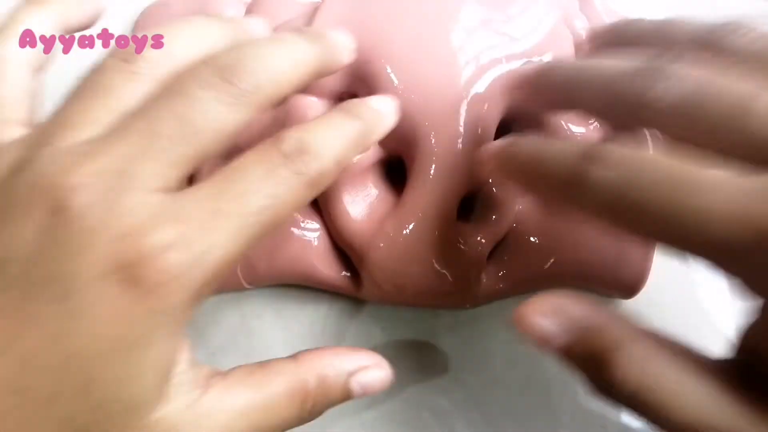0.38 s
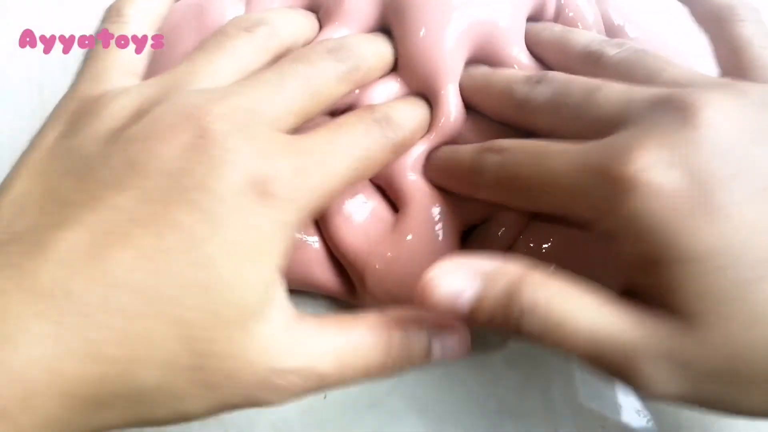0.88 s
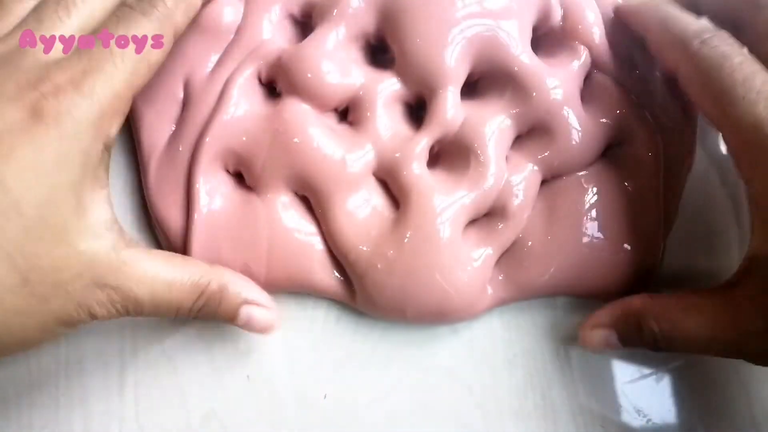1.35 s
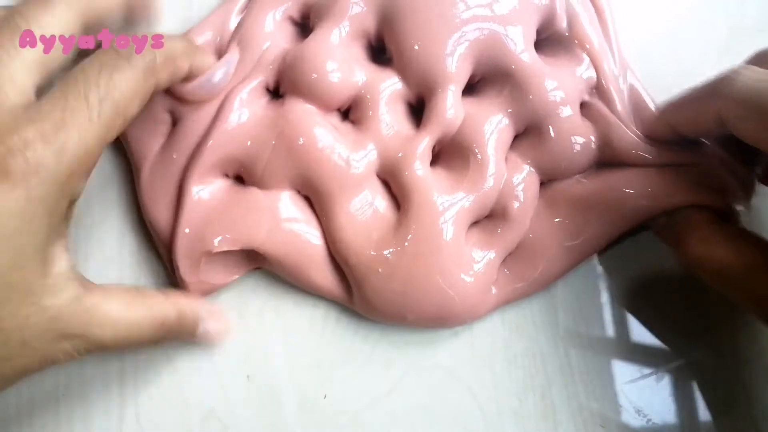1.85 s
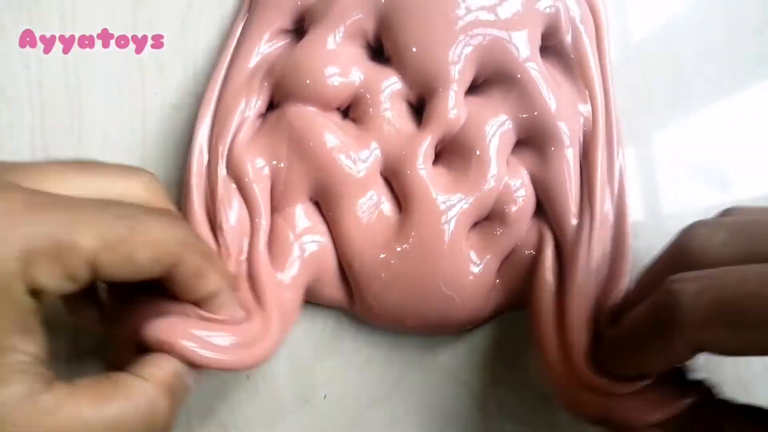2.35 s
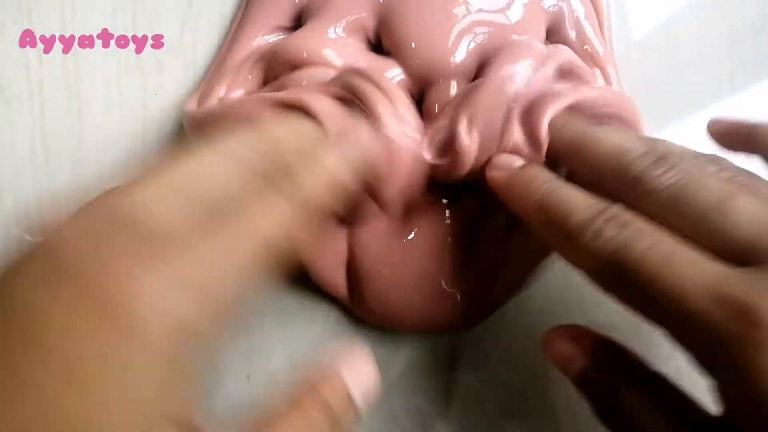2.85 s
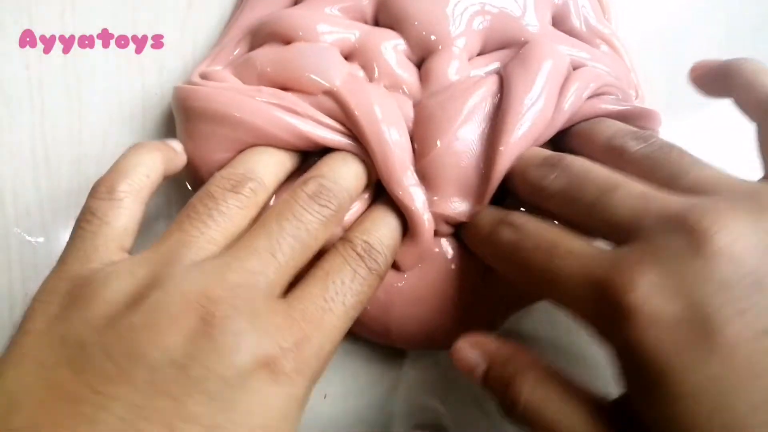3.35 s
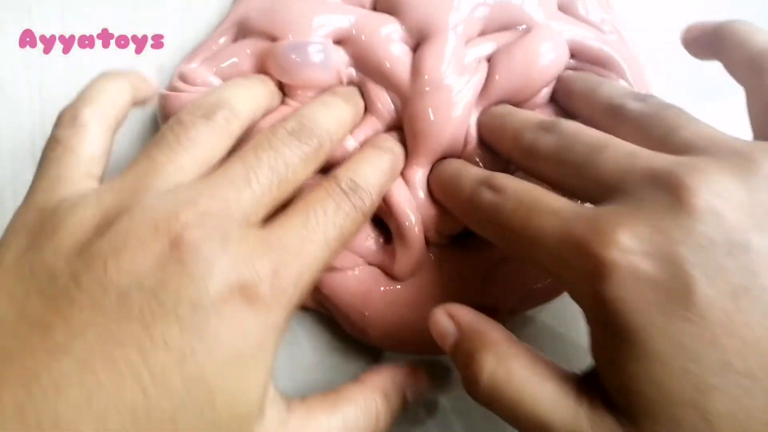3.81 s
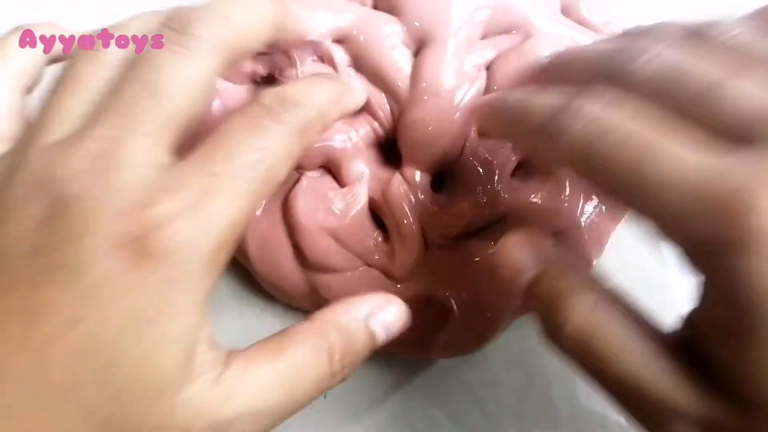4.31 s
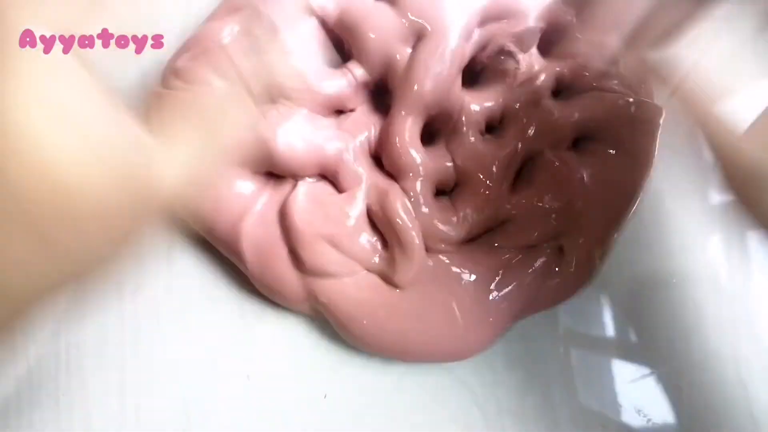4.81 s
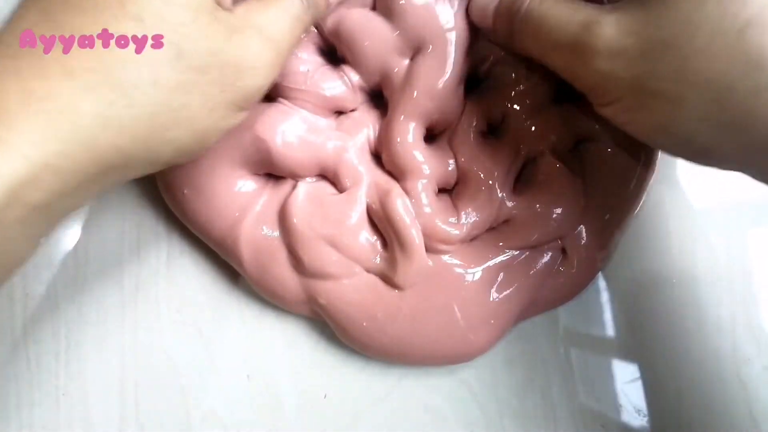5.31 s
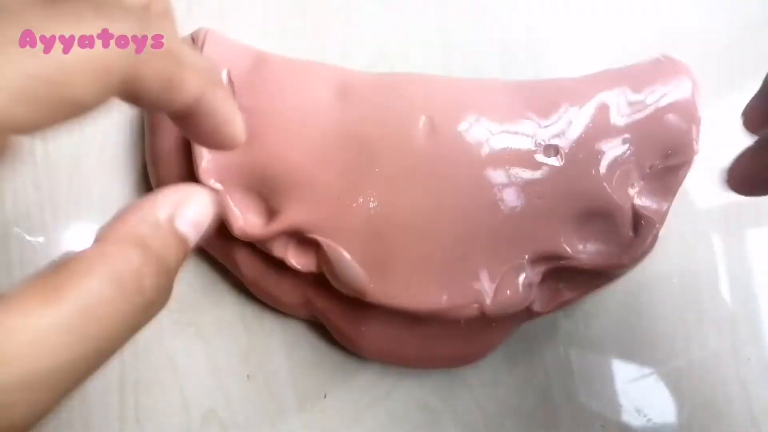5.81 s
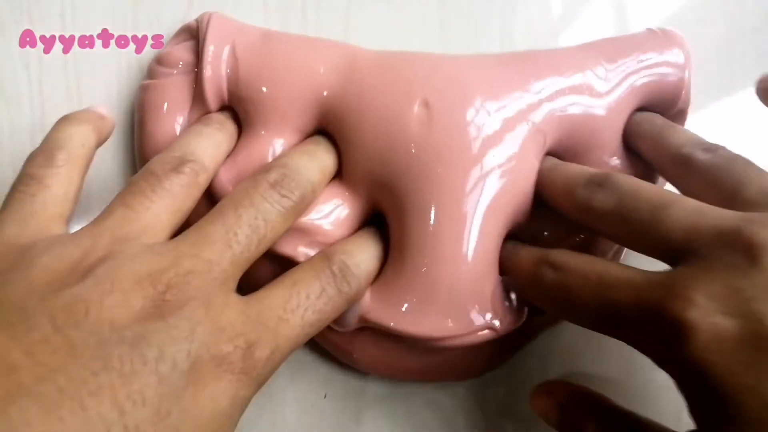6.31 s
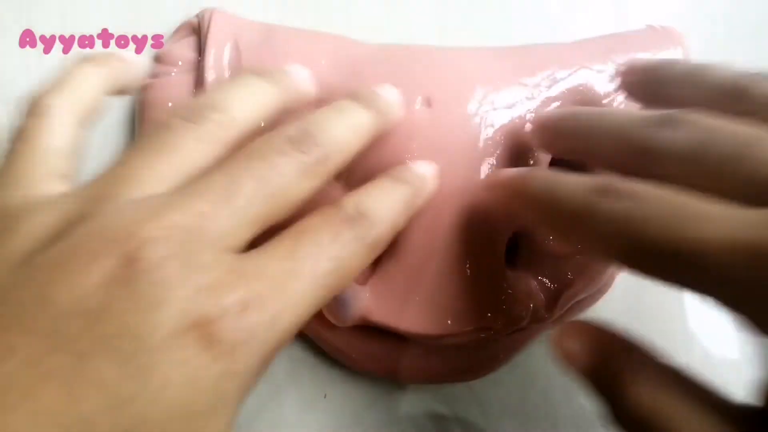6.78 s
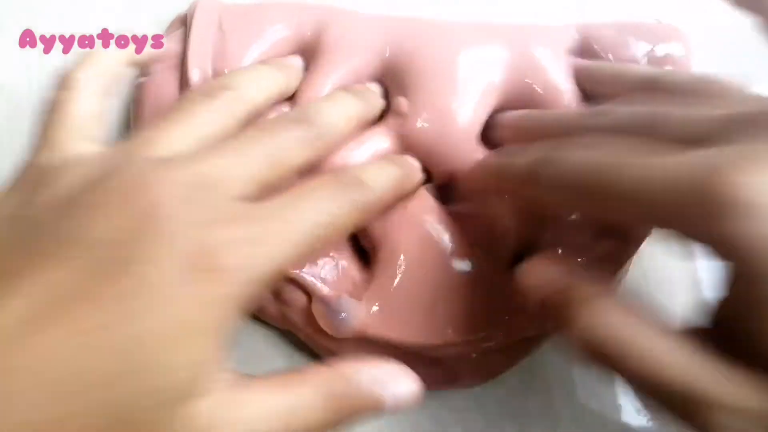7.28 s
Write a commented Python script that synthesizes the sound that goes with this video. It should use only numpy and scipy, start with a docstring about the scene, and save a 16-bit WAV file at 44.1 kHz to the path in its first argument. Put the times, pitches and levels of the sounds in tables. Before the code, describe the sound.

Thick glossy slime pops under fingers: several loud, dry-edged clicks with quick rising hollow tones crowd into each brief burst, spread left and right. The first two bursts lead to a long quiet stretch of faint stretching ticks and rustle, then louder bursts return. A small table resonance and short room tail follow each one. Far chirps and a soft low hum sit almost unheard behind, recorded very close.

```python
"""Fingers pull out of thick glossy slime on a table in a small room, close to a pair of microphones.
From the start, in bursts to the end, noisy clicks snap and gliding sines ring the holes; the table rings along.
A small object clinks among the first pops as decaying sines. Then filtered grains rustle between the bursts,
far noise-blurred chirps come in, faint ticks click as the slime is stretched, and soft knocks follow.
Throughout, a noise tail gives the room, and shaped noise gives the low rumble, wavering hum and hiss."""
import sys
import numpy as np
from scipy import signal
from scipy.fft import rfft, irfft, next_fast_len
from scipy.io import wavfile

SR = 44100
rng = np.random.default_rng(int(sys.argv[2]) if len(sys.argv) > 2 else 0)


def amplitude_ratio(level_db):
    """Convert a level in decibels to the matching linear amplitude (field) ratio."""
    exponent = np.asarray(level_db, float) / 20
    return 10 ** exponent


def output_pcm(signal):
    """Save a mono or channel-first signal as 16-bit PCM at the path in sys.argv[1].

    Samples are clipped to [-1, 1] before scaling.
    """
    pcm = np.clip(np.atleast_2d(signal).T, -1, 1) * 32767
    wavfile.write(sys.argv[1], SR, np.round(pcm).astype(np.int16))


N = 326767

# a finger pops out: t/s, snap rms level/dB, hole peak level/dB, hole f/Hz, left-right level/dB
POPS = [(0.0546, -44.5, -52.5, 1920, -11.5), (0.0703, -36, -43.5, 1206, -2), (0.197, -23.5, -25, 1400, -1),
        (0.2076, -33, -21.5, 960, 7.5), (0.2116, -12, -20, 1340, 1), (0.231, -12, -20, 1650, 0.5),
        (0.2383, -26, -24.5, 1200, 0), (0.2613, -30.5, -27.5, 1122, -2), (0.941, -29, -22, 1300, 4.5),
        (0.9444, -17.5, -21.5, 1300, -1.5), (0.952, -12.5, -19.5, 2220, 2.5),
        (0.9696, -16.5, -17.5, 1904, -3), (0.979, -37.5, -30, 2060, -0.5), (3.4207, -11.5, -20, 1914, 7.5),
        (3.4468, -6, -24, 1400, -6.5), (3.458, -20, -19, 1090, 3), (3.4653, -7.5, -15, 1394, 1),
        (3.9699, -57, -64, 2964, 8.5), (4.157, -29.5, -31, 1340, 2.5), (4.1734, -24, -17, 1420, 1.5),
        (4.1794, -12, -19.5, 1365, 0), (4.184, -23, -30, 1210, -8), (4.1929, -11.5, -19.5, 1280, -2.5),
        (4.2112, -21.5, -17, 1240, 1), (4.7745, -35.5, -33.5, 2160, 2), (4.7835, -35, -36, 750, 3),
        (4.7922, -29.5, -22, 2355, -1.5), (4.7974, -12, -18.5, 1660, -3.5), (4.8094, -23, -16, 1190, -2),
        (4.822, -17, -18.5, 1160, 0), (5.683, -35, -33.5, 790, 5), (5.7008, -60, -49, 700, -4.5),
        (5.7213, -49.5, -38.5, 1130, -2.5), (6.5749, -12.5, -20.5, 2260, 0.5), (6.5925, -5, -15.5, 1004, 1),
        (6.594, -12, -18, 886, 3), (6.5989, -13, -16.5, 1339, 6.5), (6.6094, -18, -27, 1170, 3),
        (6.62, -15.5, -15, 1820, 2), (7.2776, -27.5, -25.5, 945, 6), (7.2958, -24.5, -30.5, 1160, 0),
        (7.3006, -18, -17.5, 1340, 0), (7.3112, -22.5, -17.5, 990, 4), (7.3215, -25, -49, 1070, -1),
        (7.3259, -16.5, -20.5, 1280, -6), (7.334, -42.5, -31, 1330, -7), (7.341, -32, -31.5, 1200, 3)]
# modes of the table top under a pop: f/Hz, width/Hz, relative level/dB
TABLE_MODES = [(161, 74, -12.5), (348.5, 34, -10.5), (649, 24, -10), (807, 63, -6.5), (893, 28, -8.5),
               (1040, 54, -5), (1090, 46, -2), (1300, 110, -11.5), (1643, 40, -8.5), (1890, 43, -12),
               (2223, 53, -7), (2530, 150, -4.5)]
# stretched slime lets go of skin or table: t/s, snap rms level/dB, left-right level/dB
TICKS = [(1.4194, -63, 8), (1.5545, -59.5, -8), (1.7958, -61, 0), (1.9743, -61, -1.5), (2.2764, -68, 10),
         (2.539, -70, -2.5), (2.6994, -70.5, -3), (3.1659, -57.5, 4), (3.1751, -67, 14.5),
         (3.978, -67.5, 0), (5.147, -56.5, -3), (5.2434, -63.5, -1), (5.3369, -62.5, -3.5),
         (5.6194, -63, -4)]
# bright part of the sticky rustle while the slime is handled: t/s, rms level/dB
RUSTLE = [(0.5, -78.5), (0.749, -82.5), (0.9, -69), (1.25, -89), (1.45, -81), (2.2, -77), (2.289, -66.5),
          (2.66, -79.5), (3.14, -75.5), (3.401, -90.5), (4.72, -88.5), (5.05, -70), (5.5, -78), (5.64, -68),
          (5.85, -88.5), (6.2, -84.5), (6.3, -69), (6.52, -85)]
# a small hard object is touched once: t/s, level/dB
CLINK = (.0712, -44)
# its ringing modes: f/Hz, relative level/dB, t60/s
CLINK_MODES = [(2280, -7, 0.047), (4200, -10, 0.073), (7321, -17.5, .19), (8129, -19.5, .2),
               (8570, 4, 0.15), (8640, -9.5, .23), (11130, -18, .3)]
# small knocks on the table: t/s, level before the soft onset/dB, f/Hz, t60/s
BUMPS = [(1.9, -50.5, 192, 0.13), (5.041, -50.5, 331.7, 0.13), (5.774, -46, 2900, 0.024)]
# room tail by band: low f/Hz, high f/Hz, relative level/dB, t60/s, left-right likeness (1 = same)
ROOM_BANDS = [(102, 600, -33.5, 0.14, .9), (605, 1200, -36.5, 0.21, 0.28), (1400, 3200, -35.5, 0.22, 0.11),
              (2480, 4500, -37, .2, .01), (5500, 10500, -43, 0.27, .01), (10400, 12000, -39.5, 0.16, .01),
              (13100, 20000, -32.5, 0.15, .01)]
# far thin chirps: t/s, length/s, start f/Hz, end f/Hz, rms level before the fades/dB
CHIRPS = [(1.244, .16, 2907, 2799, -68), (4.358, 0.11, 2986, 2910, -69), (4.418, .08, 6505, 6800, -72.5),
          (5.956, .1, 7300, 6876, -71.5), (6.025, .1, 6320, 6340, -72), (6.991, .11, 7300, 7230, -71),
          (7.085, 0.11, 6650, 6540, -74)]
# spectrum of rumble and hiss: f/Hz, relative level per Hz/dB
FLOOR_SPECTRUM = [(12, -33.5), (20, -4), (111, -2), (189, -8), (237, -13), (361, -14), (551, -20.5),
                  (1210, -26), (5670, -30), (7100, -26), (9410, -31.5), (10500, -24.5), (12100, -34.5),
                  (15500, -29.5), (15750, -52.5)]
# how alike the two channels of that noise are: f/Hz, left-right likeness (1 = same)
FLOOR_LIKENESS = [(60, 0.93), (180, 0.92), (550, 0.2), (1650, -0.14), (4970, 0.037), (15000, -0.03)]
# faint wavering hum: f/Hz, width at half amplitude/Hz, rms level before the left-right tilt/dB
HUM = [(38, 14, -76), (110, 23, -71.5), (192.5, 5.6, -76)]


def at_hz(points, hz):
    """Read a curve on a log-frequency axis."""
    point_hz, value = np.transpose(points)
    return np.interp(np.log(hz), np.log(point_hz), value)


def rms_one(x):
    """Scale to rms 1."""
    return x / np.sqrt(np.mean(x ** 2) + 1e-20)


def band(x, low_hz, high_hz):
    """Butterworth band-pass."""
    edges = [low_hz, min(high_hz, 0.45 * SR)]
    return signal.sosfilt(signal.butter(2, edges, "band", fs=SR, output="sos"), x)


def ring(x, hz, t60):
    """A resonator: a unit click sets a decaying sine of starting height 1 ringing."""
    r, w = amplitude_ratio(-60 / (t60 * SR)), 2 * np.pi * hz / SR
    return signal.lfilter([0, np.sin(w)], [1, -2 * r * np.cos(w), r * r], x + 1e-18)


def two_channels(mid, side, alike):
    """Mix two unrelated noises into a left-right pair of the given likeness."""
    alike = np.clip(alike, -1, 1)
    return np.sqrt(1 + alike) * mid + np.sqrt(1 - alike) * side * [[1], [-1]]


def add(out, s, sound, pan_db):
    """Place a sound at time s, louder on the left by pan_db."""
    i = round(s * SR)
    panned = sound * amplitude_ratio(np.array([[pan_db], [-pan_db]]) / 2)
    out[:, i:i + sound.shape[-1]] += panned[:, :N - i]


def pops():
    """Each seal snaps and its finger hole rings like a short bottle."""
    seals = snaps([(s, snap_db, pan_db) for s, snap_db, _, _, pan_db in POPS])
    return band(holes() + seals, 500, 17000)  # the pops carry nothing below 500 Hz


def snaps(rows):
    """Every tear has a pitch of its own, set by its gap, and its own share of spitting air."""
    out = np.zeros((2, N))
    for s, snap_db, pan_db in rows:
        gap_hz = rng.normal(8140, 406)
        spit_db = snap_db + rng.normal(-12, 3)
        add(out, s, snap(gap_hz, snap_db, spit_db), pan_db)
    return out


def snap(gap_hz, snap_db, spit_db):
    """A film tears in dying clicks that ring briefly at the size of the gap, under a thin spit of air."""
    size, tear_s, clicks_per_s = 600, 0.0016, 4000
    t = np.arange(size) / SR
    # each microphone hears the tear by its own path
    struck = rng.random((2, size)) < clicks_per_s / SR
    clicks = struck * rng.normal(0, 1.8, (2, size)) * np.exp(-t / tear_s)
    clicks[:, 0] = rng.choice([-1, 1], 2)
    crackle = amplitude_ratio(-3.0) * band(clicks, 5500, 11000)
    body = band(ring(clicks, gap_hz, 0.0016) + crackle, 3000, 13000)
    air = band(clicks, 10500, 24000) + amplitude_ratio(-9.5) * ring(clicks, 15000, 0.0029)
    spit = band(air, 6300, 18000)

    def even(x):
        """Scale the energy to rms 1 over 2.6 ms (115 samples)."""
        return x / np.sqrt(np.sum(x ** 2, axis=1, keepdims=True) / 115)

    return amplitude_ratio(snap_db) * even(body) + amplitude_ratio(spit_db) * even(spit)


def holes():
    """The air in each hole rings, rising in pitch as it opens; the soft walls damp it fast."""
    out, t = np.zeros((2, N)), np.arange(2000) / SR
    t60, onset_s, path_s = 0.011, 0.00015, 0.00013
    for s, _, hole_db, hole_hz, pan_db in POPS:
        turn = 2 * np.pi * hole_hz
        phase = turn * (t + 2.7 * t * t) + rng.uniform(0, 2 * np.pi)
        phase = phase + turn * rng.normal(0, path_s) * np.array([[1], [-1]])  # paths to the microphones differ
        decay = amplitude_ratio(hole_db - 60 * t / t60)
        add(out, s, decay * np.sin(phase) * (1 - np.exp(-t / onset_s)), pan_db)
    return out


def table():
    """Each pop pushes the table; low modes reach both microphones alike, high ones with signs of their own."""
    out = np.zeros((2, N))
    s, _, hole_db, hole_hz, _ = np.transpose(POPS)
    at = np.round(s * SR).astype(int)
    for hz, width_hz, level_db in TABLE_MODES:
        sign_draw, flip_draw, level_draw = rng.random((3, len(POPS)))
        sign = np.sign(sign_draw - 0.5)
        flip_chance = np.clip((hz - 600) / 1000, 0, 0.5)
        flip = np.where(flip_draw < flip_chance, -1, 1)
        # modes near the hole's pitch are driven hardest
        near_db = 5 - 16 * np.minimum(np.abs(np.log2(hz / hole_hz)), 0.6)
        push_db = hole_db + near_db + level_db - 13.2 + 2.8 * level_draw
        push = np.zeros((2, N))
        push[:, at] = amplitude_ratio(push_db) * sign * [np.ones_like(flip), flip]
        out += ring(push, hz, 2.9 / width_hz)
    return out


def ticks():
    """Stretched slime lets go in single faint snaps."""
    return snaps(TICKS)


def rustle():
    """A dense sticky rustle of tiny random grains, in a bright band and a duller one that follows it."""
    struck = rng.random((2, N)) < 3000 / SR  # grains per second
    size_db = 3 * rng.exponential(1, (2, N)).clip(0, 4)
    grains = struck * rng.standard_normal((2, N)) * amplitude_ratio(size_db)
    bright_db = np.interp(np.arange(N) / SR, *np.transpose(RUSTLE))
    dull_db = -80.5 + 1.1 * (bright_db + 73)
    bright = amplitude_ratio(bright_db) * rms_one(band(grains, 6200, 8800))
    dull = amplitude_ratio(dull_db) * rms_one(band(grains, 1800, 5500))
    return bright + dull


def clink():
    """A touched hard object rings out in its modes."""
    out, click = np.zeros((2, N)), np.eye(1, 14000)
    clink_s, clink_db = CLINK
    for hz, level_db, t60 in CLINK_MODES:
        add(out, clink_s, amplitude_ratio(clink_db + level_db) * ring(click, hz, t60), -2.5)
    return out


def bumps():
    """Each knock rings in one mode; the lower its pitch, the softer its onset."""
    out, click = np.zeros((2, N)), np.eye(1, 14000)
    t = np.arange(14000) / SR
    for s, level_db, hz, t60 in BUMPS:
        onset = 1 - np.exp(-t * hz)
        add(out, s, amplitude_ratio(level_db) * ring(click, hz, t60) * onset, 0)
    return out


def room(x):
    """Dense echoes: noise that dies band by band, building up after the first walls."""
    t, tail = np.arange(20000) / SR, 0
    for low_hz, high_hz, level_db, t60, alike in ROOM_BANDS:
        mid, side = band(rng.standard_normal((2, len(t))), low_hz, high_hz)
        tail = tail + amplitude_ratio(level_db - 60 * t / t60) * two_channels(mid, side, alike)
    build_up = 1 - np.exp(-(t / 0.0066) ** 2)
    sent = x.mean(axis=0, keepdims=True) + x / 2
    return signal.fftconvolve(sent, tail * build_up, axes=1)[:, :N]


def chirps():
    """Gliding whistles blurred by distance: narrow noise on a sliding pitch."""
    out = np.zeros((2, N))
    for s, length_s, start_hz, end_hz, level_db in CHIRPS:
        size = round(length_s * SR)
        noise = rng.standard_normal((2, 2, size + 500))
        blur = signal.lfilter([1], [1, -0.985], noise)[..., 500:]  # drop the filter's start
        phase = 2 * np.pi * np.cumsum(np.linspace(start_hz, end_hz, size)) / SR
        whistle = rms_one(blur[0] * np.sin(phase) + blur[1] * np.cos(phase))
        add(out, s, amplitude_ratio(level_db) * whistle * np.hanning(size) ** 0.5, 0)
    return out


def floor():
    """Shaped white noise: rumble nearly alike in both channels, hiss nearly unrelated, hum the same in both."""
    size = next_fast_len(N)
    hz = np.maximum(np.arange(size // 2 + 1) * SR / size, 10)
    mid, side, drone = rfft(rng.standard_normal((3, size)))
    both = two_channels(mid, side, at_hz(FLOOR_LIKENESS, hz))
    shaped = irfft(both * amplitude_ratio(at_hz(FLOOR_SPECTRUM, hz)), size)[:, :N]
    out = amplitude_ratio(-62.5) * rms_one(shaped)
    for hum_hz, width_hz, level_db in HUM:
        peak = 1 / (1 + (2 * (hz - hum_hz) / width_hz) ** 2)
        out = out + amplitude_ratio(level_db) * rms_one(irfft(drone * peak, size)[:N])
    return out * amplitude_ratio([[-0.6], [0.6]])  # right a little louder


def scene():
    """The slime's own sounds and the table's ring fill the room; the rest is added without it."""
    slime, top = pops() + ticks() + rustle(), table()
    tail = room(slime + amplitude_ratio(-3) * top)
    return slime + top + tail + clink() + bumps() + chirps() + floor()


def top_cut(x):
    """Nothing passes above the cut-off."""
    return signal.sosfilt(signal.butter(12, 16660, fs=SR, output="sos"), x)


def record(dry):
    """Peaks beyond 0.93 of full scale are cut flat."""
    mix = np.clip(dry, -0.93, 0.93)
    return top_cut(mix)


dry = scene()
out = record(dry)
output_pcm(out)
```